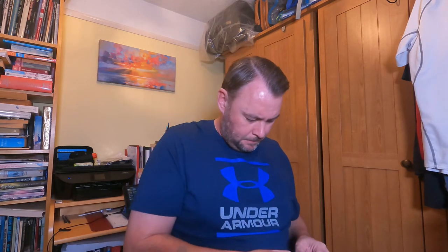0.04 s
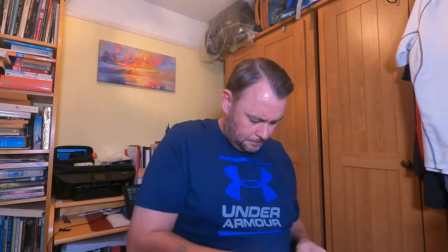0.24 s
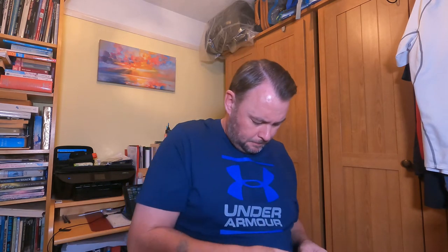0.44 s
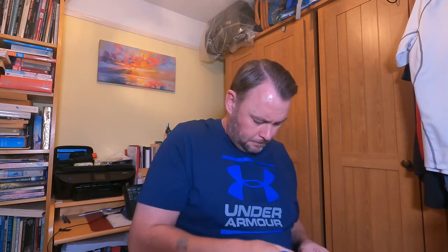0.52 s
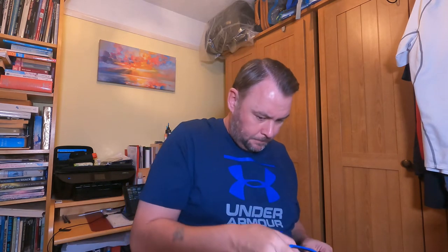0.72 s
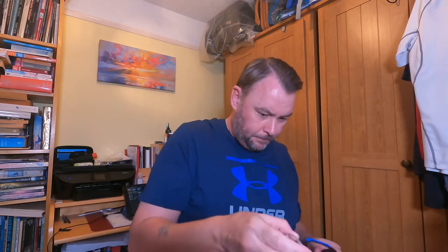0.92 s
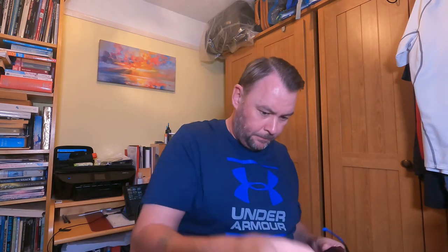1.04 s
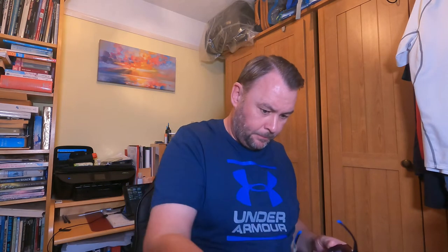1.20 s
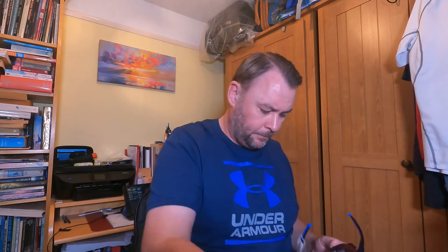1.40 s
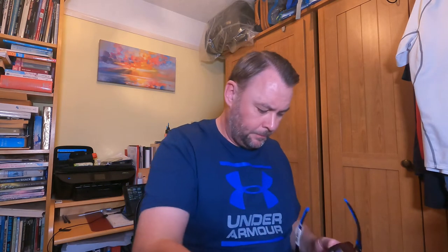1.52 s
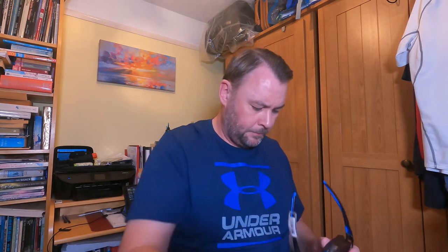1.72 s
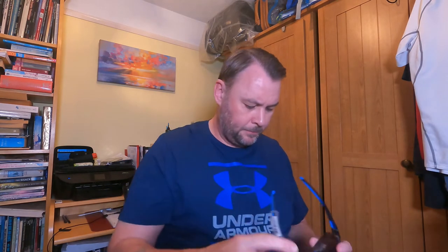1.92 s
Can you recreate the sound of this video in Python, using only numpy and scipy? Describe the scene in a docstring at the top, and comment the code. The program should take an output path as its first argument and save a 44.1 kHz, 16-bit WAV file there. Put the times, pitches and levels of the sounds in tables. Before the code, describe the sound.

A hard plastic glasses case gives a sharp snap and a click. After some soft rubbing, the glasses rattle and things knock on a wooden desk, trailing off in light ticks, near the microphone in a quiet room.

```python
"""Glasses and their case at a desk

In a small, quiet room a hard plastic case snaps and its catch clicks. Things are put down on a
wooden desk with a few hollow knocks, and the frame of the glasses rattles and ticks as it is lifted.
Each hit is a quickly fading noise plus ringing tones. Sliding fingers add a soft rustle."""
import sys
import numpy as np
from scipy import signal
from scipy.fft import rfft
from scipy.io import wavfile
from scipy.ndimage import uniform_filter1d

SR = 44100
rng = np.random.default_rng(int(sys.argv[2]) if len(sys.argv) > 2 else 0)


def transcribe(u):
    """Save the signal u as a 16-bit wav file named by the first command-line argument.

    u: samples, shape (n,) or (channels, n), limited to [-1, 1]; the rate is SR.
    q: integer samples, one column per channel.
    """
    v = np.clip(np.atleast_2d(u).T, -1, 1)
    q = np.round(v * 32767).astype(np.int16)
    wavfile.write(sys.argv[1], SR, q)


N = 85995
SIZE = 16384  # samples in one hit
HZ = np.maximum(np.fft.rfftfreq(SIZE, 1 / SR), 1)  # the pitches at which filters are set
AGE = np.arange(SIZE) / SR  # seconds since a hit
KNOCK_FADE_S = 0.021  # a fade time is how long a sound takes to drop by 60 dB

# The tones of the wooden desk. Each row: pitch in Hz, level in dB, fade time in seconds.
DESK_TONES = [(158.6, -9, 0.33), (229.6, -6, 0.26), (333.5, -3.5, .28), (551, -11, 0.19), (604.6, 5.5, 0.2),
              (676, -3.5, 0.22), (836.6, 0, .17), (873, -1.5, .14), (1025, -8.5, .14)]


def case_snap():
    """The case snaps shut in a quick run of hits that make its shell ring."""
    # Each row: start in seconds, level in dB, pitch in Hz, ringing in dB relative to the hit.
    snaps = [(0.212, -46, 3230, -15.5), (0.2189, -32, 3630, -11), (0.2227, -17, 3030, -16),
             (0.2239, -14, 3480, -15), (0.2253, -14, 2320, -14), (0.2289, -9.5, 4100, -4),
             (0.235, -23, 6500, -10)]
    # The tones of the shell. Each row: pitch in Hz, level in dB, fade time in seconds.
    shell_tones = [(1790, -13.5, .07), (2950, -4.5, 0.1), (3060, -10, .12), (3420, -15, 0.095),
                   (3700, -6, 0.06), (4250, 0.5, 0.084), (4451, -2, .08)]
    hits, shell = np.zeros((2, N))
    for (start, db, hz, ring_db), noise in zip(snaps, rng.standard_normal((len(snaps), 3, SIZE))):
        hit = plastic_hit(noise, hump(hz, octaves=.55), fade_s=.019, crack_db=-20, thud_db=-28)
        add(hits, start, amp(db) * hit)
        add(shell, start, amp(db + ring_db) * ring(shell_tones, np.sign(noise[2])))
    return in_room(hits, echo_db=-6.5) + shell


def catch_click():
    """The catch makes one hard click and bounces straight back for a softer one."""
    # The tones of the catch. Each row: pitch in Hz, level in dB, fade time in seconds.
    catch_tones = [(1813, -20.5, 0.022), (2300, -16.5, 0.025), (2920, -0.5, 0.016), (3250, 2.5, 0.0058),
                   (3940, -1, 0.014), (4770, -2.5, .008), (6550, -14, 0.0072), (7260, -11.5, 0.0035),
                   (10700, -10, 0.0015)]
    start, bounce_s, db = .3686, .00118, -13
    out = np.zeros(N)
    crack = burst(rng.standard_normal(SIZE), fade_s=.0072, gain=hump(2420, octaves=.87))
    click = ring(catch_tones, signs=(-1) ** np.arange(len(catch_tones)))
    add(out, start, amp(db) * (click + amp(-15) * crack))
    add(out, start + bounce_s, amp(db - 3) * click)
    return in_room(out, echo_db=-7)


def glasses_rattle():
    """Each touch ticks at its own pitch and makes the hinges and the plastic frame ring."""
    # Each row: start in seconds, level in dB, pitch in Hz, width in octaves,
    # then hinge, crack and thud, each in dB relative to the tick.
    ticks = [(0.8364, -33, 2350, 0.93, -13, -18.5, -8), (0.8672, -31, 2290, 0.27, -16.5, -37, -12.5),
             (.9560, -41.5, 3000, .7, 1, -20, -15), (0.9876, -38, 2260, 0.67, -3, -27, -12),
             (1.0437, -35, 2020, 0.53, -22, -26, -16), (1.4894, -30, 2160, .55, 0, -24, -32),
             (1.5025, -26, 4680, 0.53, 4, -16, -43), (1.5318, -16.5, 4100, 0.55, -22, -33, -11),
             (1.6080, -17, 2700, 0.26, -1.5, -21, -13), (1.6153, -18.5, 2300, 0.66, -13, -9.5, -16.5),
             (1.6429, -19.5, 4830, 0.4, -13, -19, -10.5), (1.649, -24.5, 4260, 0.54, -12, -37, -8),
             (1.684, -29.5, 2870, 0.57, -10, -24, -8), (1.7005, -41.5, 2400, 0.96, -2.5, -10, -1.5),
             (1.7201, -27.5, 2480, 0.19, -6, -25.5, -24), (1.7345, -41, 2550, 0.76, -3, -20, -12),
             (1.7575, -34, 3120, 0.58, 3, -39, -14), (1.7785, -34.5, 2600, .55, -12, -37, -17),
             (1.7860, -37.5, 2660, 0.77, 5, -34, -16), (1.7988, -28, 2510, 0.27, -10, -32, -16.5),
             (1.8020, -28, 2720, 0.44, -20, -31, -14), (1.8165, -47.5, 2310, 0.25, -9, -14, 1),
             (1.8720, -39, 3300, 0.34, -14, -20, -6.5), (1.9, -39, 2700, 0.53, -21, -32, -7),
             (1.9143, -37.5, 2440, 0.47, -18, -26, -16), (1.9310, -41.5, 2700, 0.55, -21, -28, -15)]
    # The tones of the frame. Each row: pitch in Hz, level in dB, fade time in seconds.
    frame_tones = [(1925, -7, 0.054), (2050, -2.5, 0.027), (2243, -0.5, 0.047), (2456, -2.5, 0.039),
                   (2890, -9.5, 0.039), (3600, -9, 0.029), (3977, -9, 0.076)]
    out = np.zeros(N)
    for row, noise in zip(ticks, rng.standard_normal((len(ticks), 4, SIZE))):
        start, db, hz, octaves, hinge_db, crack_db, thud_db = row
        hinge = amp(hinge_db) * hump(4640, octaves=.13)
        body = np.hypot(hump(hz, octaves), hinge)
        fade_s = .01 + .0008 * max(-22 - db, 0)  # touches lighter than -22 dB chatter for longer
        tick = plastic_hit(noise, body, fade_s, crack_db, thud_db)
        frame = amp(-6.5) * ring(frame_tones, np.sign(noise[3]))
        add(out, start, amp(db) * (tick + frame))
    return in_room(out, echo_db=-7)


def plastic_hit(noise, body, fade_s, crack_db, thud_db):
    """Plastic meets plastic: a bright click with a sharp crack, and a thud passed on to the desk."""
    click = burst(noise[0], fade_s, np.hypot(body, amp(crack_db)), smoothing=420)
    thud = burst(noise[1], KNOCK_FADE_S, hump(595, octaves=.62))
    wood = amp(-2) * ring(DESK_TONES, np.sign(noise[2]))
    return click + amp(thud_db) * (thud + wood)


def desk_knocks():
    """Things land with dull knocks that leave the desk ringing."""
    # Each row: start in seconds, level in dB, pitch in Hz, slope above that pitch in dB per octave,
    # then ringing and room echo, both in dB relative to the knock.
    knocks = [(1.3682, -23.5, 402, -7, -7.5, -2), (1.5452, -14.5, 800, -7, -3.5, -4.5),
              (1.5728, -13.5, 787, -9.5, -13.5, -15)]
    bass_db_per_octave = 11
    out = np.zeros(N)
    for row, noise in zip(knocks, rng.standard_normal((len(knocks), 2, SIZE))):
        start, db, hz, slope_db, ring_db, echo_db = row
        octave = np.log2(HZ / hz)
        gain = amp(np.minimum(bass_db_per_octave * octave, slope_db * octave))
        knock = burst(noise[0], KNOCK_FADE_S, gain, smoothing=90)
        wood = amp(ring_db) * ring(DESK_TONES, np.sign(noise[1]))
        add(out, start, amp(db) * (in_room(knock, echo_db) + wood))
    return out


def hollow_case():
    """Fingers moving on the case keep the air inside it ringing softly."""
    # How loud it rings. Each row: time in seconds, level in dB.
    loudness = [(0, -94), (1.5, -85), (1.56, -45), (1.68, -47), (1.75, -54), (1.80, -39), (1.85, -54.5),
                (1.88, -47), (1.95, -50)]
    # The tones of the air inside. Each row: pitch in Hz, width in Hz, level in dB.
    air_tones = [(605, 34, 0.5), (689, 41, -1.5), (840, 58, -6)]
    gain = sum(amp(db) / (1 + (2 * (HZ - hz) / width) ** 2) for hz, width, db in air_tones)
    return level_curve(loudness) * normalize(colour(rng.standard_normal(N), gain))


def finger_rubbing():
    """Fingers and cloth slide over the plastic in a dense stream of tiny slips."""
    # How loud the rubbing is. Each row: time in seconds, level in dB.
    loudness = [(0, -54), (.19, -58), (0.209, -47.5), (.30, -59.5), (.60, -67), (0.701, -58), (.73, -52.5),
                (.83, -53), (.88, -45.5), (1.0, -44.5), (1.06, -47.5), (1.12, -59.5), (1.249, -62.5),
                (1.345, -63.5), (1.363, -54), (1.39, -66), (1.476, -58), (1.481, -40.5), (1.52, -40),
                (1.59, -39), (1.66, -40.5), (1.73, -52), (1.95, -54.5)]
    # Its mix of low and high sound. Each row: pitch in Hz, level in dB.
    tone = [(100, -26), (350, 1.5), (700, 1.5), (1200, 0), (2300, 3.5), (4500, -4), (6500, -13.5),
            (8500, -13), (11000, -23), (14000, -23)]
    slips_per_s, spread_db = 3500, -3
    slips = rng.standard_normal(N) * amp(spread_db * np.minimum(rng.exponential(1, N), 4))
    slips *= rng.random(N) < slips_per_s / SR
    rustle = normalize(colour(slips, amp(at_pitch(tone, HZ))))
    return in_room(level_curve(loudness) * rustle, echo_db=-6)


def room_air():
    """The still room gives a faint, steady hush."""
    # Its mix of low and high sound. Each row: pitch in Hz, level in dB.
    tone = [(25, -5), (45, -14), (80, -8), (125, -4.5), (158, 4), (200, -0.5), (300, -1.5), (600, 3.5),
            (1000, -1.5), (2000, -7.5), (4000, -13), (6500, -14), (8500, -19), (11000, -16), (14000, -30)]
    hush = colour(rng.standard_normal(N + SIZE), amp(at_pitch(tone, HZ)))[SIZE:]
    return amp(-57) * normalize(hush)


def in_room(x, echo_db):
    """Adds the many quick echoes of a small room."""
    # How long the echoes last. Each row: pitch in Hz, fade time in seconds.
    fade_times = [(150, 0.12), (500, 0.1), (1400, 0.24), (3500, 0.17), (10000, .19)]
    rise_s = .0023
    echoes = rng.choice([-1., 1.], SIZE) * (rng.random(SIZE) < 1 / 10)
    hz, t, bands = signal.stft(echoes, SR, nperseg=256)
    fade = amp(-60 * t / at_pitch(fade_times, hz)[:, None])
    tail = signal.istft(bands * fade, SR, nperseg=256)[1][:SIZE]
    tail *= 1 - np.exp(-(AGE / rise_s) ** 2)
    power = uniform_filter1d(abs(rfft(tail)) ** 2, size=90)
    tail = colour(tail, 1 / np.sqrt(power))  # even out lows and highs
    return x + amp(echo_db) * signal.fftconvolve(x, tail)[:len(x)]


def burst(noise, fade_s, gain, smoothing=200):
    """Many short, crowded tones blur into a fading noise, evened out and then shaped by gain."""
    x = noise * amp(-60 * AGE / fade_s)
    power = abs(uniform_filter1d(abs(rfft(x)) ** 2, smoothing))
    return normalize_hit(colour(x, gain / np.sqrt(power + 1e-12)))


def ring(tones, signs):
    """A struck object sounds all its tones at once, each fading at its own speed."""
    return normalize_hit(sum(sign * amp(db - 60 * AGE / fade_s) * np.sin(2 * np.pi * hz * AGE)
                             for (hz, db, fade_s), sign in zip(tones, signs)))


def hump(hz, octaves):
    """A bell-shaped gain curve around one pitch."""
    return np.exp(-(np.log2(HZ / hz) / octaves / 2) ** 2)


def colour(x, gain):
    """Turns each pitch in HZ up or down by its gain, with no sound ahead of a hit."""
    log_gain = np.log(np.maximum(gain / gain.max(), 1e-5))
    mirrored = np.r_[log_gain, log_gain[-2:0:-1]]
    taps = np.fft.ifft(np.exp(np.conj(signal.hilbert(mirrored)))).real
    return gain.max() * signal.fftconvolve(x, taps[:SIZE // 4])[:len(x)]


def amp(db):
    """Turns decibels into a gain to multiply by."""
    return 10 ** (np.asarray(db) / 20)


def at_pitch(points, hz):
    """Looks up values between the rows of a table of pitches."""
    pitches, values = np.transpose(points)
    return np.interp(np.log(hz + 1), np.log(pitches), values)


def level_curve(points):
    """Joins rows of time and dB into a gain for every sample."""
    return amp(np.interp(np.arange(N) / SR, *np.transpose(points)))


def normalize(x):
    """Scales a sound to an average power of 1."""
    return x / np.sqrt(np.mean(x ** 2) + 1e-20)


def normalize_hit(x):
    """Gives a hit the energy of 0.005 seconds of sound at power 1."""
    return x * np.sqrt(.005 * SR / (np.sum(x ** 2) + 1e-20))


def add(mix, start, sound):
    """Mixes a sound in at a start time in seconds."""
    part = mix[round(start * SR):][:len(sound)]
    part += sound[:len(part)]


def scene():
    """All the sounds together, the same on the left and right."""
    hits = case_snap() + catch_click() + glasses_rattle() + desk_knocks()
    mono = hits + hollow_case() + finger_rubbing() + room_air()
    return np.array([mono, mono])


def record(dry):
    """The microphone softens the deep bass and high treble, and the very top is cut off."""
    # What the microphone picks up. Each row: pitch in Hz, gain in dB.
    microphone = [(40, -19), (105, -10.5), (155, 0.5), (1000, -3), (6000, -3), (8000, -13), (9200, -20.5),
                  (10000, -13.5), (11000, -9), (12200, -17), (13800, -19.5), (14500, -28.5)]
    top_hz = 14300
    heard = np.array([colour(side, amp(at_pitch(microphone, HZ))) for side in dry])
    treble_cut = signal.firwin(255, top_hz, window=("kaiser", 9), fs=SR)
    return signal.oaconvolve(heard, treble_cut[None], "same")


dry = scene()
out = record(dry)
transcribe(out)
```